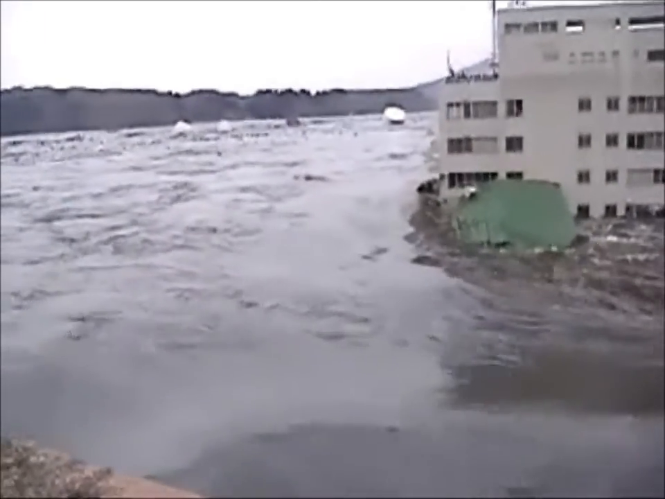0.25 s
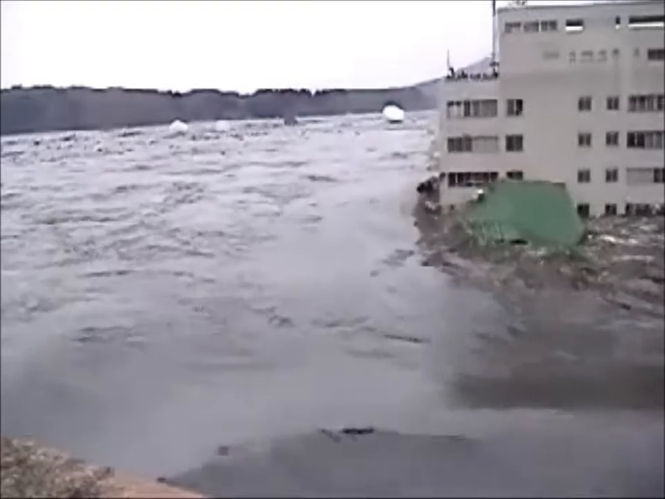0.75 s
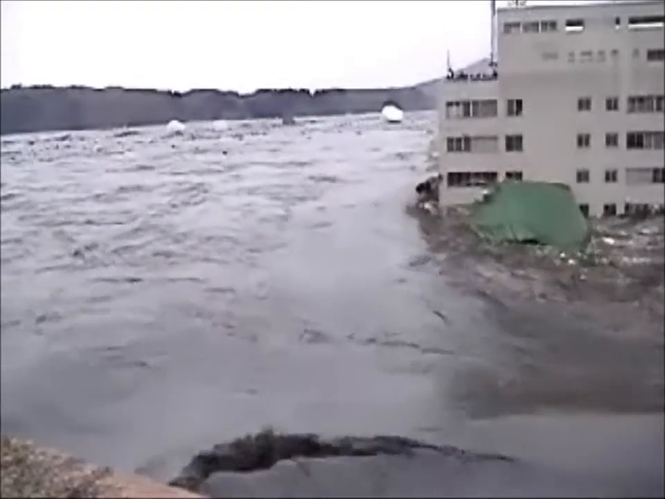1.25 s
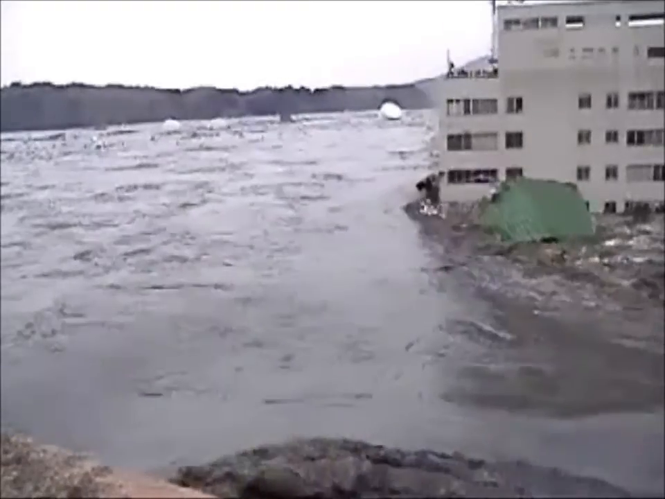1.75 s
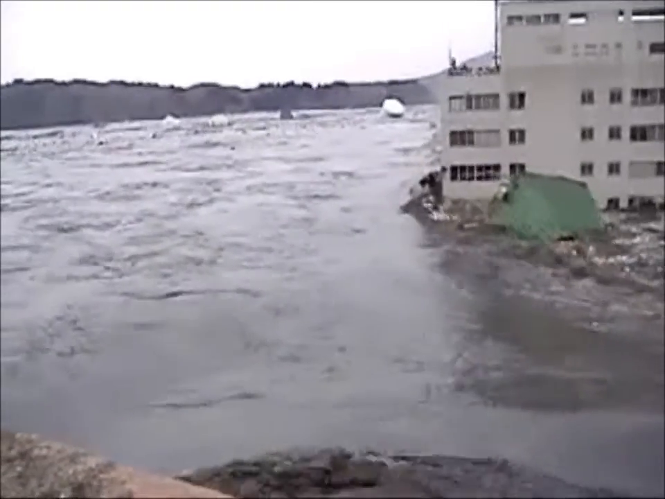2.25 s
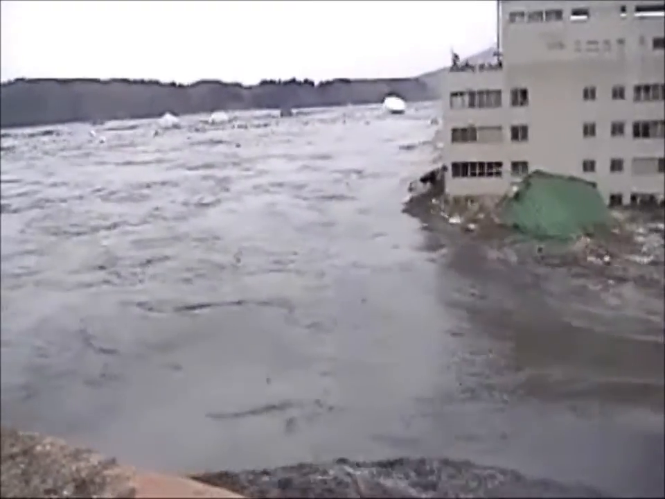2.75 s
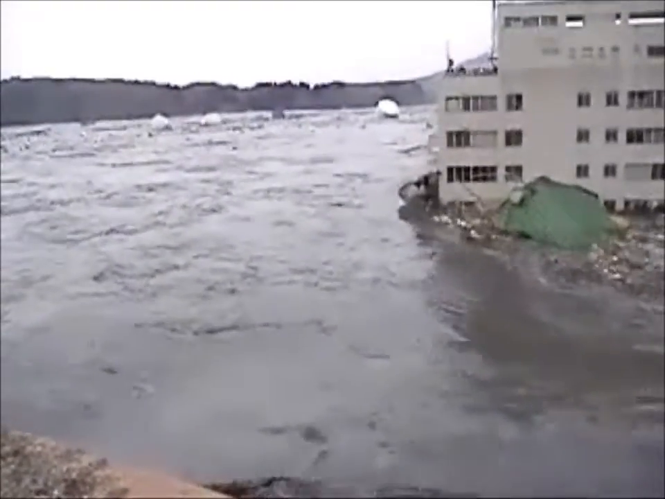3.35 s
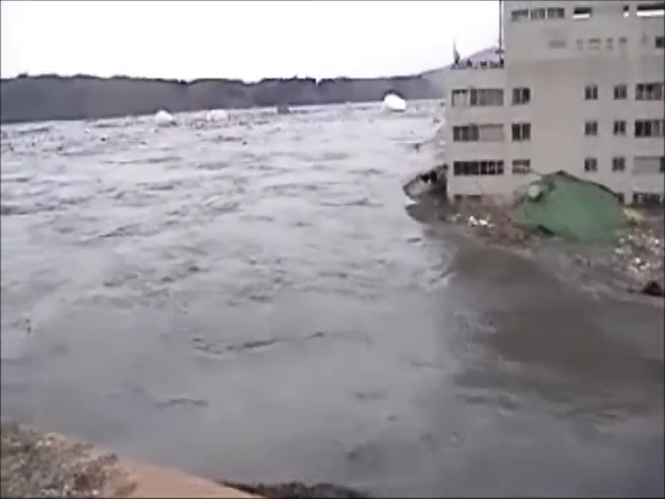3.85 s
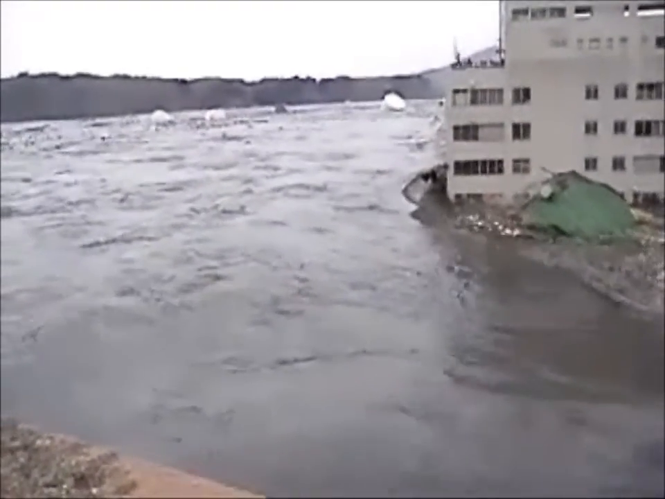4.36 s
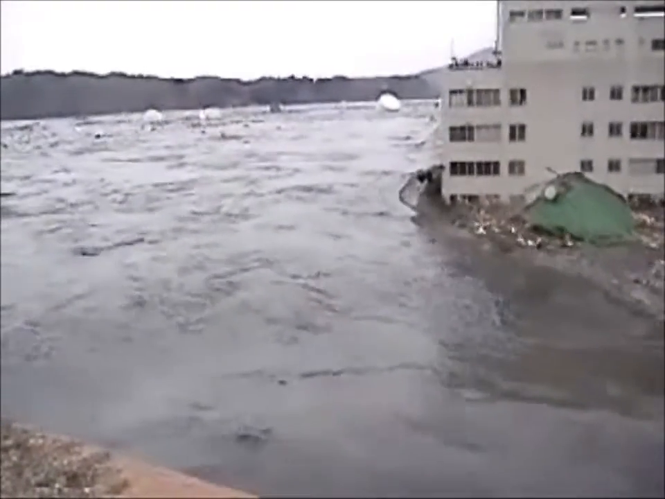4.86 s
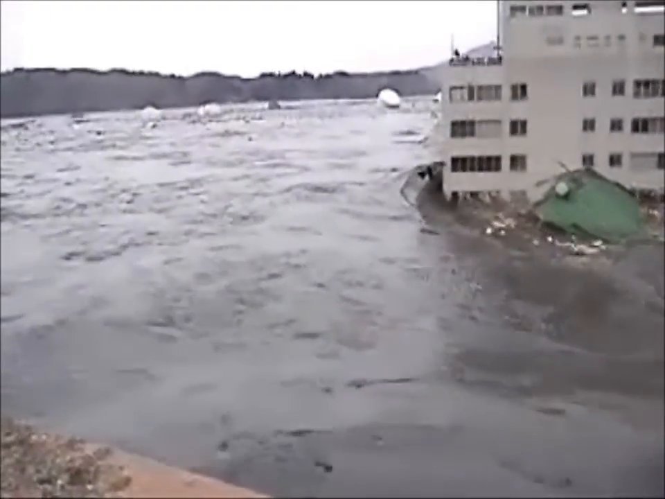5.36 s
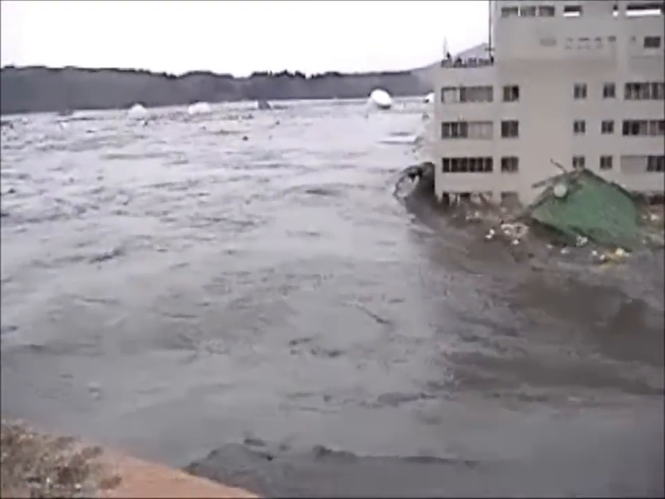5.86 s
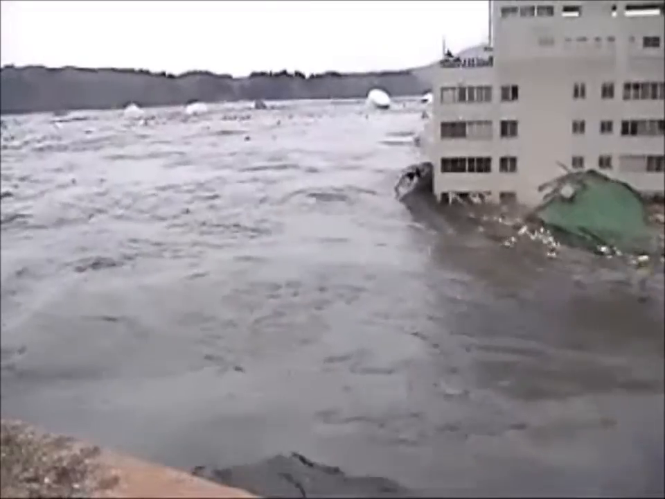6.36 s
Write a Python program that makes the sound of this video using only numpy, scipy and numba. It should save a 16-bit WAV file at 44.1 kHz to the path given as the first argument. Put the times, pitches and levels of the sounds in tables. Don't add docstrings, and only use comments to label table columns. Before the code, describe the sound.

Loud, steady roar of floodwater rushing past a bank, with hollow timber knocks, deep watery gulps and sharp snapping, splintering wreckage.

```python
import sys
import numpy as np
from scipy import signal
from scipy.fft import rfft, irfft, dct
from scipy.io import wavfile
from scipy.ndimage import uniform_filter1d
from numba import njit

SR = 44100
rng = np.random.default_rng(int(sys.argv[2]) if len(sys.argv) > 2 else 0)


def bounce(signal):
    frames = np.transpose(np.atleast_2d(signal))
    limited = np.clip(frames, -1, 1)
    pcm = np.round(limited * 32767).astype(np.int16)
    wavfile.write(sys.argv[1], SR, pcm)


def nominal_scale(level):
    x = np.asarray(level, float) / 20
    return 10 ** x


N = 291809

LAYER_HZ = [
    150,
    900,
    3000,
    6200,
]
# pitch_hz, level_db (per Hz)
WASH_SPECTRUM = [(8.2, -31), (14, -16.5), (27, -4), (166, 1.5), (286, -1), (408, -5), (783, -5.5),
                 (1210, -10.5), (1720, -13), (1880, -16), (2030, -20), (2660, -18), (4000, -21),
                 (6900, -32.5), (8340, -39), (9300, -49), (12100, -84), (20500, -120)]
# start_s, churn_db, spray_db
CHURN = [(0, 1.5, 2), (.65, 0.5, 1.5), (.9, .5, 0.5), (1.05, 1.5, 2.5), (1.2, 1, 1), (1.699, .5, 1),
         (2.0, -1, -2.5), (2.6, 0, 1.5), (3.15, 1, 1.5), (3.28, 1, 2.5), (3.42, 0, 0.5), (4.2, 0.5, 1),
         (4.7, -1, .5), (5.5, 0, 0.5), (5.74, 0, -1.5), (5.85, 1.5, 1.5), (6.2, -0.5, -1),
         (6.62, -0.5, 0.5)]
# churn_share (dB per dB), spray_share (dB per dB)
LAYER_RESPONSE = [
    (-0.49, -.1),
    (1, -0.24),
    (-0.27, 0.95),
    (-.2, 0.09),
]
# start_s, peak_db, pitch_hz, ring_t60_s
SURGE_GULPS = [(.442, -13, 240, .11), (1.263, -11.5, 225, 0.22), (1.358, -16, 335, 0.17),
               (1.77, -12, 298, .2), (2.935, -10.5, 302, .15), (3.0, -16, 340, 0.19), (3.23, -12, 349, .15),
               (3.923, -13, 222, 0.16), (4.344, -12, 205, .2), (5.0, -13, 500, .1), (5.146, -11, 230, 0.15),
               (5.97, -14, 500, .1), (6.28, -14, 200, .15), (6.4, -14, 200, .15), (5.343, -8.5, 280, 0.12),
               (5.78, -10, 620, 0.17), (6.585, -11, 318, .2)]
# start_s, peak_db, pitch_hz, ring_t60_s
TIMBER_KNOCKS = [(.074, -14, 1370, .04), (.112, -14, 1530, .04), (.315, -13, 1360, 0.043),
                 (.537, -15, 1860, .03), (.936, -16, 1620, .04), (1.402, -16, 1860, .03),
                 (1.502, -16, 1940, .03), (2.904, -14, 1450, .04), (3.076, -16, 1790, .03),
                 (3.627, -13, 1360, .05), (3.836, -19, 2130, .04), (3.84, -12, 1000, .05),
                 (.159, -14, 990, .05), (.452, -3, 760, .045), (.488, -12, 850, .04), (.553, -11, 900, .05),
                 (.565, -9, 822, 0.09), (.583, -13, 760, 0.11), (.64, -12, 1750, 0.038),
                 (.653, -11, 1630, .08), (.655, -4.5, 1060, 0.051), (0.678, -12, 1820, .03),
                 (0.764, -8, 1730, .04), (0.779, -5, 1110, .04), (1.338, -12, 651, .05),
                 (1.492, -8, 807, .06), (1.574, -12, 1050, .06), (2.649, -10, 700, 0.054),
                 (2.749, -9, 1014, .06), (3.065, -12, 934, 0.046), (3.184, -13, 675, .05),
                 (3.757, -13, 781, .05), (3.82, -9, 1510, .06), (3.997, -4.5, 1500, 0.05),
                 (4.123, -8, 1430, 0.057), (4.477, -11, 791, .05), (4.769, -9, 700, 0.055),
                 (4.77, -10, 1640, .04), (4.923, -10.5, 1560, .04), (5.54, -11, 624, 0.049),
                 (5.807, -9, 920, .06), (6.184, -9.5, 1200, .08), (6.194, -11, 1350, .05),
                 (6.241, -12, 1280, .05), (6.246, -8.5, 1410, .06), (6.255, -12, 1230, .05),
                 (6.29, -15, 1250, .05)]
# start_s, level_db, centre_hz, length_s
SNAPS = [(.82, -25, 3600, 0.0094), (.962, -26, 3580, 0.0093), (1.212, -27, 3540, .01),
         (1.578, -24.5, 3600, .01), (1.664, -24.5, 3700, .009), (2.875, -19.5, 3070, 0.011),
         (2.877, -24, 4130, 0.0043), (1.762, -28, 4130, 0.013), (4.0, -29, 2580, 0.0054),
         (4.255, -20, 3200, 0.0036), (4.263, -19.5, 4300, 0.005), (4.377, -19.5, 2500, .004),
         (4.54, -29, 4470, 0.0073), (4.647, -25, 3320, 0.0047), (4.924, -23, 2650, 0.005),
         (6.1845, -20, 3500, 0.001), (6.1845, -15.5, 2700, 0.004), (6.525, -18.5, 4000, .006),
         (6.532, -27, 4900, .009), (5.7535, -15.5, 2750, 0.002), (5.764, -24, 3200, 0.01),
         (6.208, -22, 2800, .003), (6.214, -25, 2600, .003), (4.924, -23, 3750, .004),
         (4.924, -27, 2500, .004), (4.919, -30, 5000, .003), (4.377, -26, 4500, .003),
         (4.378, -28, 3500, .003), (.952, -27, 4130, .005), (.395, -31, 4650, .004),
         (2.873, -27, 3270, .004), (4.264, -25, 3000, .005), (6.589, -30.5, 4500, 0.012)]
# start_s, level_db, centre_hz, length_s
SPLINTERS = [(.405, -29, 3100, 0.044), (.535, -20, 1490, .01), (.774, -19, 1450, 0.014),
             (.787, -27, 1700, 0.0086), (1.6, -28, 3790, .008), (2.72, -27.5, 4130, .01),
             (4.44, -27, 1550, .04), (4.5, -28, 1500, .04), (.17, -24, 950, .05), (4.715, -25, 1500, .012),
             (4.75, -25, 1600, .02), (4.94, -26, 1500, 0.018), (.924, -28, 3560, 0.032),
             (1.282, -21, 2900, 0.016), (1.332, -26, 2830, .013), (1.359, -25, 3400, .023),
             (1.488, -28.5, 2570, 0.018), (1.541, -30, 3030, 0.028), (1.613, -28, 3020, .014),
             (1.57, -22, 1750, 0.016), (1.71, -25, 1730, 0.018), (2.693, -25.5, 3300, 0.023),
             (2.694, -25, 1660, 0.036), (2.717, -28, 3260, 0.034), (2.876, -23, 1570, 0.029),
             (2.7, -34.5, 4800, 0.069), (3.816, -27.5, 4800, .008), (4.699, -29.5, 1590, 0.091),
             (4.923, -18.5, 1850, 0.008), (5.754, -18, 2980, 0.025), (5.76, -27, 4200, .022),
             (5.755, -19, 2650, .02), (5.787, -21.5, 3030, 0.025), (5.82, -24.5, 3050, .03),
             (5.79, -33, 4500, 0.042), (2.69, -28, 3900, .06), (.43, -24, 840, 0.19), (.05, -26, 900, 0.18),
             (4.84, -28, 3300, .03), (6.245, -26, 2690, 0.025)]
# start_s, level_db, centre_hz, length_s
SCRAPES = [
    (1.2, -33.5, 2550, 0.51),
    (1.71, -27, 2550, 0.019),
    (4.785, -30, 2430, 0.014),
    (4.812, -31, 2650, .012),
    (1.758, -26.5, 2630, 0.015),
    (2.735, -28, 2600, 0.02),
    (6.017, -29, 2730, .009),
]
# start_s, level_db, centre_hz, length_s
TICKS = [(.822, -33, 5900, 0.0054), (2.873, -33, 5530, 0.01), (4.922, -28, 3500, .005),
         (3.133, -28, 5000, .002), (4.003, -32, 6000, 0.0017), (4.263, -35, 6500, .007),
         (4.377, -32, 4000, 0.0043), (.236, -34.5, 5860, .003), (1.22, -38.5, 6900, .003),
         (2.133, -40, 7700, .003), (2.874, -34.5, 7000, .003), (3.333, -37.5, 7000, .004),
         (5.7535, -35, 6000, 0.002), (5.756, -35, 6600, 0.022), (5.999, -32, 6000, .001),
         (6.527, -34, 6500, .01)]


def wash(curves, flicker_db=0.5, shared_db=-1.2):
    f = np.fft.rfftfreq(N, 1 / SR)
    roar = rfft(rng.standard_normal(N)) * nominal_scale(wash_density_db(f))
    octave = np.log2(np.maximum(f, 1) / 25)
    flutter = walk(15)
    out = 0
    for k in np.arange(-2, 9, .5):
        hz = 25 * 2 ** k
        part = irfft(roar * np.clip(1 - abs(octave - k) / .5, 0, 1), N)
        flutter_share = min((hz / 1100) ** 2, 1, 3200 / hz)
        flutter_db = flutter_share * (shared_db * flutter + flicker_db * walk(9))
        out = out + part * nominal_scale(surge_db(hz, curves) + flutter_db)
    return out


def wash_density_db(hz):
    f, db = np.transpose(WASH_SPECTRUM)
    return np.interp(np.log(np.maximum(hz, 1)), np.log(f), db)


def surge_db(hz, curves):
    place = np.interp(np.log(hz), np.log(LAYER_HZ), np.arange(4))
    return sum(max(1 - abs(place - k), 0) * (c - c.mean()) for k, c in enumerate(curves))


def walk(rate):
    hold = int(SR / rate)
    steps = np.repeat(rng.standard_normal(N // hold + 1), hold)
    return 1.68 * uniform_filter1d(uniform_filter1d(steps, hold), hold)[:N]


def near_bubbles(swell_db, count, lo_hz, hi_hz, cycles, spread_db):
    when, pitch, life, big, sign = rng.random((count, 5)).T
    hz = lo_hz * (hi_hz / lo_hz) ** pitch
    size_db = wash_density_db(hz) + 10 * np.log10(hz) - spread_db * np.log(1 - big * 199 / 200)
    size = np.sign(sign - .5) * nominal_scale(size_db)
    start = (when * N).astype(np.int64)
    rings = ring_bubbles(start, hz, cycles * (1 + 2 * life), size, 0.37, N)
    return rings * nominal_scale(swell_db - swell_db.mean())


@njit
def ring_bubbles(start, hz, cycles, size, glide, n):
    out = np.zeros(n)
    for k in range(len(start)):
        length = int(cycles[k] * SR / hz[k])
        phase, fade, a = 0., np.exp(-5. / length), size[k]
        for i in range(min(length, n - start[k])):
            phase += 2 * np.pi * hz[k] * (1 + glide * i / length) / SR
            out[start[k] + i] += a * np.sin(phase)
            a *= fade
    return out


def knocks(blows, soft_s):
    rise_per_s = 1.1
    out, t = np.zeros(N + SR), np.arange(SR // 4) / SR
    for start_s, db, hz, t60 in blows:
        ring = 0
        for ratio, gain in ((1, 1), (1.2, 0.41), (0.64, 0.31)):
            cycles = hz * ratio * t * (1 + rise_per_s * t)
            ring = ring + gain * np.sin(2 * np.pi * (cycles + rng.random()))
        onset = 1 - np.exp(-t / soft_s)
        first = int(start_s * SR)
        out[first:first + len(t)] += nominal_scale(db - 2.0 - 60 * t / t60) * onset * ring
    return out[:N]


def cracks(breaks, share):
    tail_s, tail_per_length, longest_tail_s = 0.012, 2.4, 0.15
    out, t = np.zeros(N + SR), np.arange(SR * 3 // 4) / SR
    for start_s, db, hz, hold in breaks:
        grit = rng.standard_normal(len(t)) * nominal_scale(3.04 * rng.standard_normal(len(t)))
        grit[0] = 14 / (1 + hold / .005)
        t60 = min(tail_s + tail_per_length * hold, longest_tail_s)
        shape = nominal_scale(-60 * np.maximum(t - hold, 0) / t60)
        body = band(band(grit * shape, hz, share * hz), hz, 1.4 * share * hz)
        first = int(start_s * SR)
        out[first:first + len(t)] += nominal_scale(db) * body / np.sqrt(share * hz / SR * 2)
    return signal.lfilter(*signal.butter(2, 7500., fs=SR), out[:N])


def band(x, hz, width):
    return signal.lfilter(*signal.iirpeak(min(hz, .4 * SR), hz / width, fs=SR), x)


def level(x, db):
    return x * nominal_scale(db) / np.sqrt(np.mean(x ** 2))


def scene():
    start_s, churn, spray = np.transpose(CHURN)
    t = np.arange(N) / SR
    curves = [np.interp(t, start_s, a * churn + b * spray) for a, b in LAYER_RESPONSE]
    slosh = near_bubbles(curves[1], count=3000, lo_hz=400, hi_hz=2000, cycles=9.0, spread_db=4.5)
    fizz = near_bubbles(curves[2], count=9000, lo_hz=2000, hi_hz=6500, cycles=7.0, spread_db=4.0)
    water = level(wash(curves), -14.5) + level(slosh, -30.0) + level(fizz, -32.5)
    water = water + knocks(SURGE_GULPS, soft_s=0.0037)
    timber = knocks(TIMBER_KNOCKS, soft_s=0.0011)
    breakage = cracks(SNAPS, 0.29) + cracks(SPLINTERS, 0.43)
    breakage = breakage + cracks(SCRAPES, 0.14) + cracks(TICKS, 0.6)
    return (water + timber + breakage)[None]


@njit
def limit(x, top, ratio, attack, release):
    y, e = np.empty(len(x)), top
    for i in range(len(x)):
        e += (abs(x[i]) - e) * (attack if abs(x[i]) > e else release)
        y[i] = x[i] * min(1., (top / e) ** (1 - 1 / ratio))
    return y


def starve(x, from_hz, step_db, scatter_db, size=2048, lead=1732):
    window = np.sin(np.pi * (np.arange(2 * size) + .5) / (2 * size))
    blocks = np.pad(x, (size + lead, 2 * size - (N + lead) % size)).reshape(-1, size)
    a, b, c, d = np.split(np.hstack([blocks[:-1], blocks[1:]]) * window, 4, axis=1)
    lines = dct(np.hstack([-c[:, ::-1] - d, a - b[:, ::-1]]), type=4, norm="ortho")
    top = int(from_hz / SR * 2 * size)
    scatter = scatter_db * rng.standard_normal((len(lines), 1))
    step = nominal_scale(step_db + scatter - np.arange(size - top) / 20)
    lines[:, top:] = step * np.trunc(lines[:, top:] / step + .45 * np.sign(lines[:, top:]))
    u, v = np.split(dct(lines, type=4, norm="ortho"), 2, axis=1)
    frames = np.hstack([v, -v[:, ::-1], -u[:, ::-1], -u]) * window
    return (frames[:-1, size:] + frames[1:, :size]).ravel()[lead:lead + N]


def roll_off(x):
    return signal.sosfilt(signal.butter(12, 9450, fs=SR, output="sos"), x)


def record(dry):
    x = limit(dry[0], .2, 2.58, 0.019, 0.00064)
    x = 1.291 * np.tanh(1.199 * x) / 1.207
    x = signal.sosfilt(signal.butter(4, 8600., fs=SR, output="sos"), x)
    x = signal.sosfilt(signal.ellip(10, .2, 80, 9600, fs=SR, output="sos"), x)
    x = starve(x, from_hz=8000, step_db=-32.5, scatter_db=0.9)
    converter_offset = -.052
    return roll_off(x[None] + converter_offset)


dry = scene()
out = record(dry)
bounce(out)
```